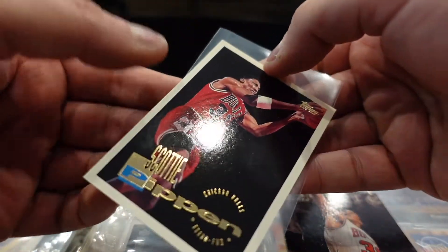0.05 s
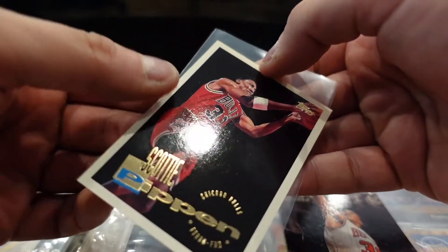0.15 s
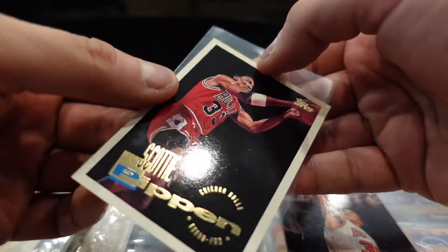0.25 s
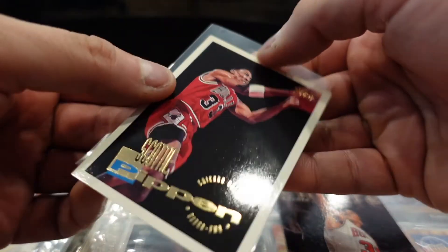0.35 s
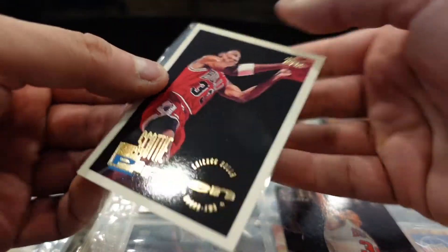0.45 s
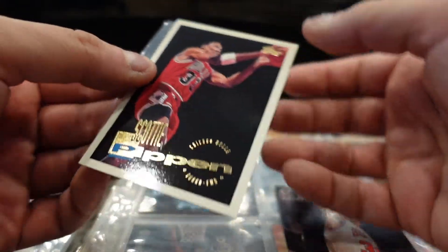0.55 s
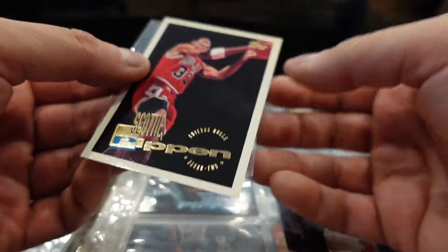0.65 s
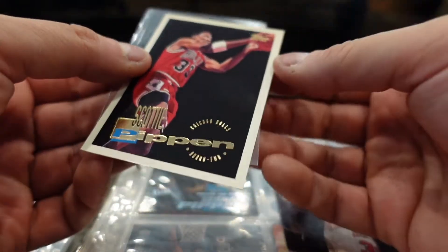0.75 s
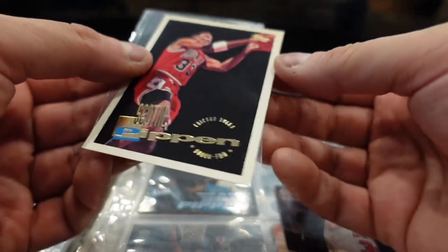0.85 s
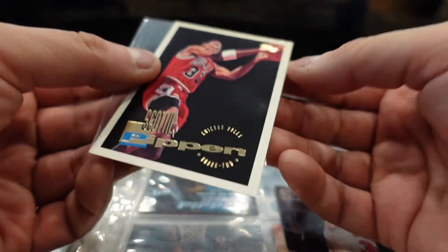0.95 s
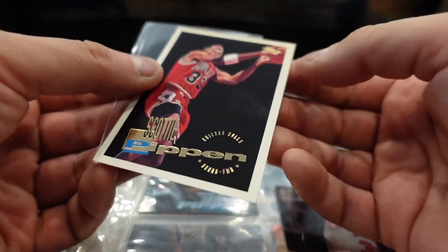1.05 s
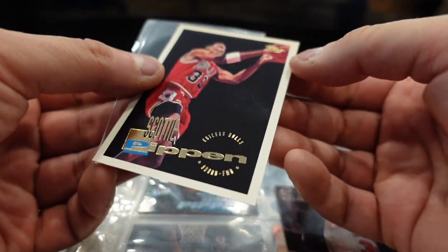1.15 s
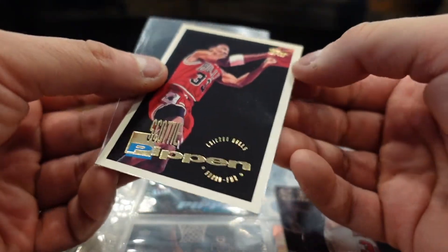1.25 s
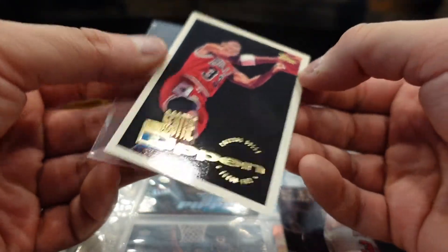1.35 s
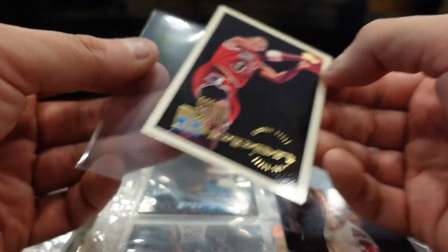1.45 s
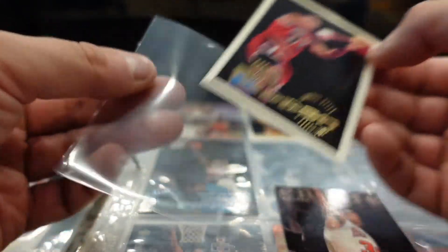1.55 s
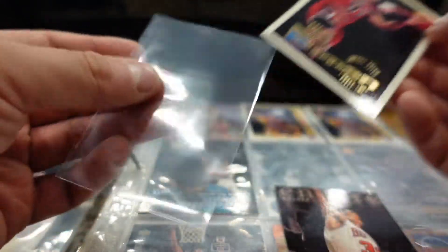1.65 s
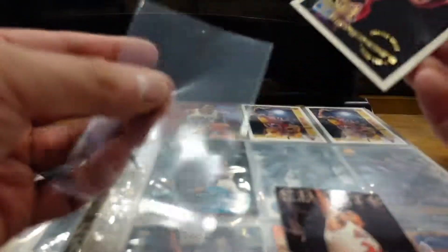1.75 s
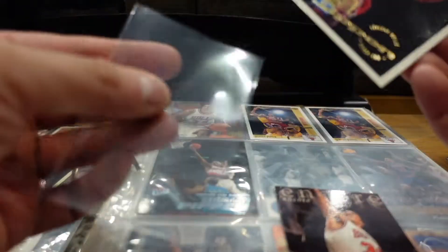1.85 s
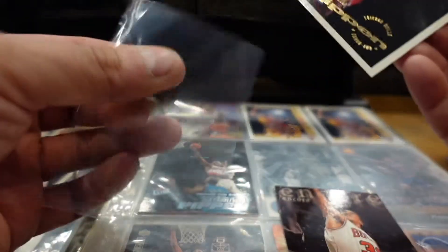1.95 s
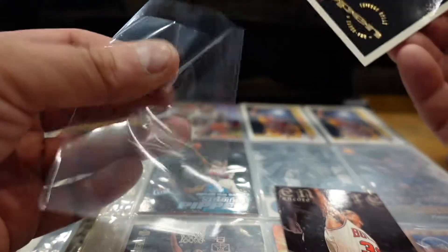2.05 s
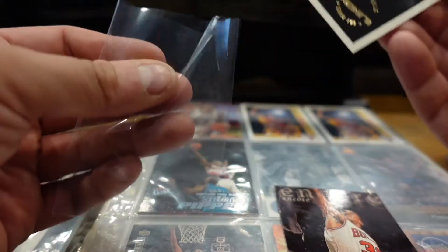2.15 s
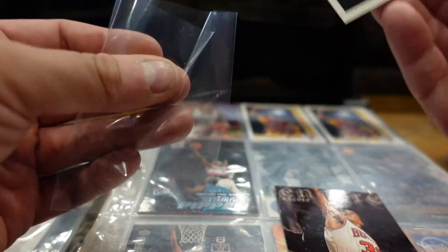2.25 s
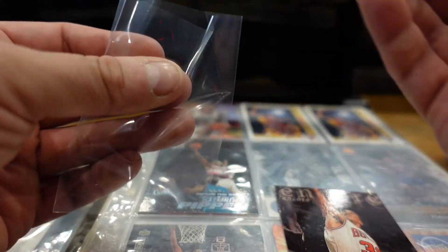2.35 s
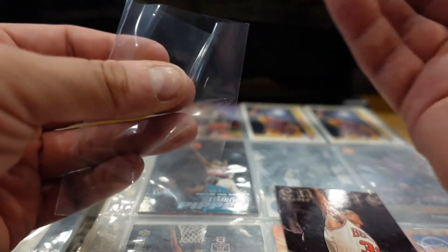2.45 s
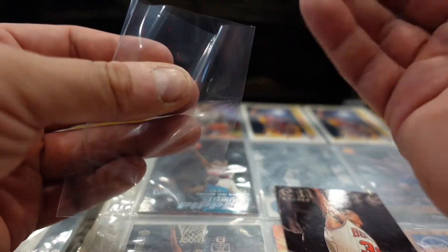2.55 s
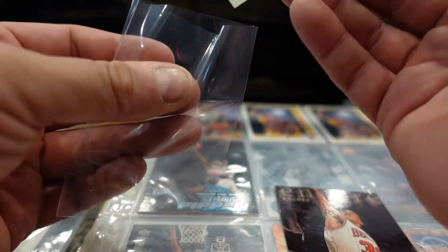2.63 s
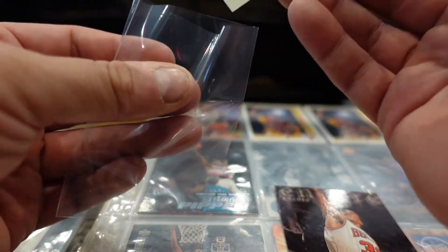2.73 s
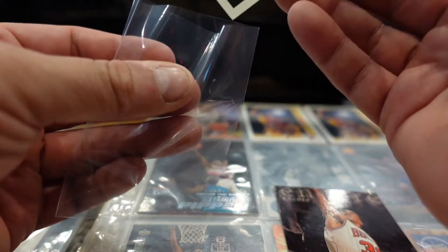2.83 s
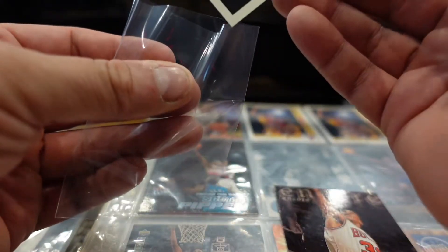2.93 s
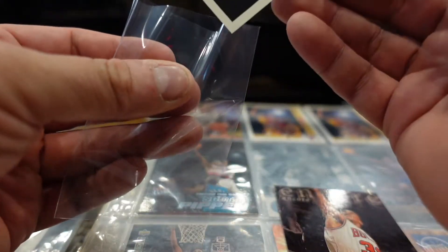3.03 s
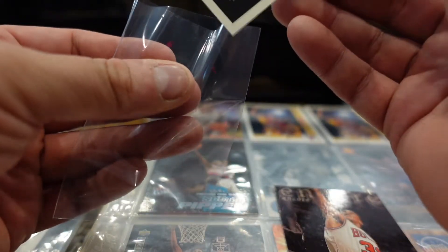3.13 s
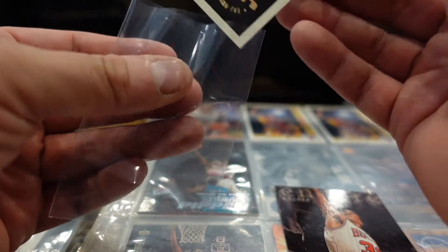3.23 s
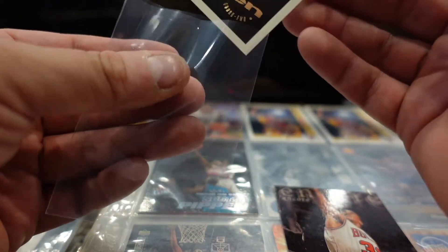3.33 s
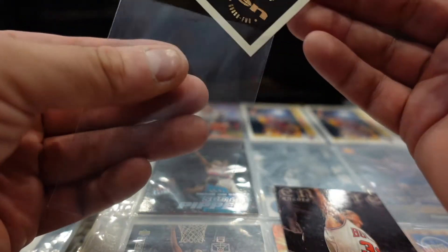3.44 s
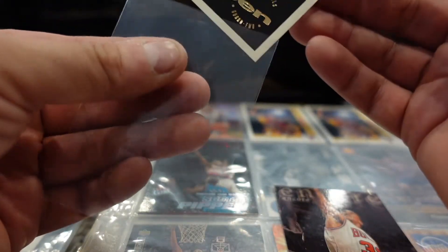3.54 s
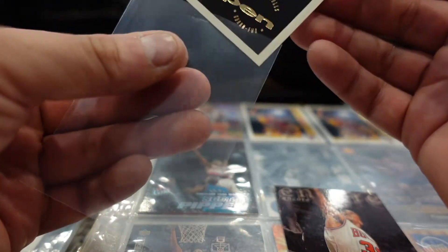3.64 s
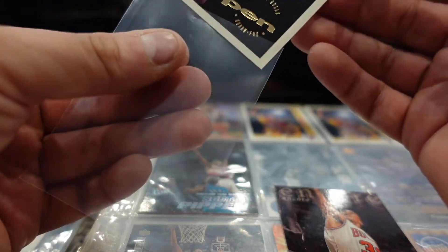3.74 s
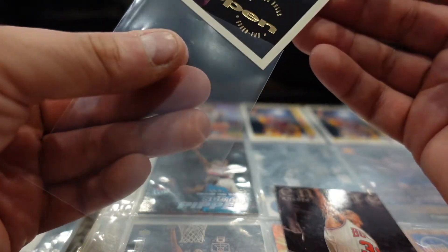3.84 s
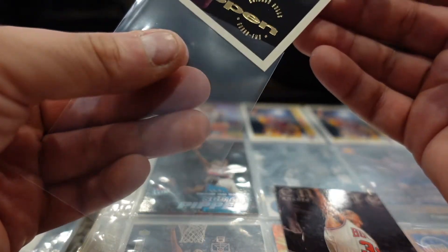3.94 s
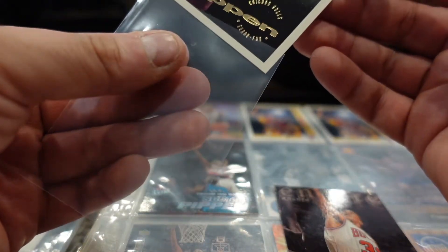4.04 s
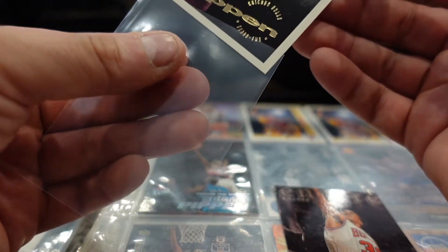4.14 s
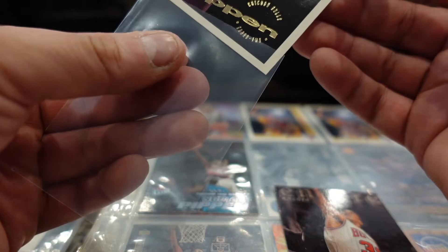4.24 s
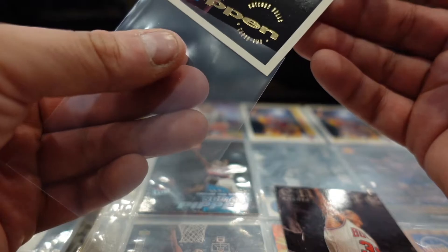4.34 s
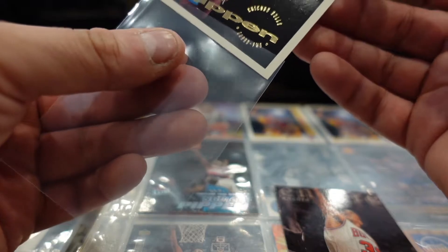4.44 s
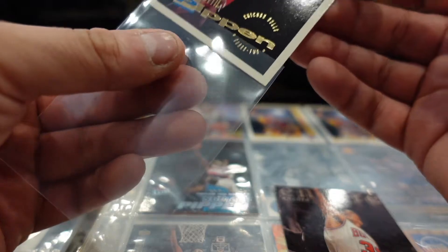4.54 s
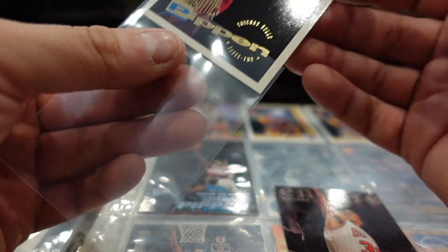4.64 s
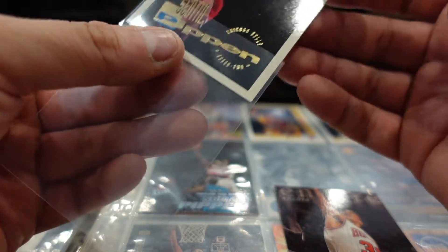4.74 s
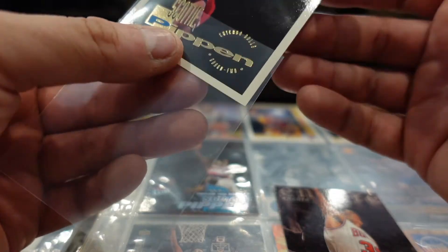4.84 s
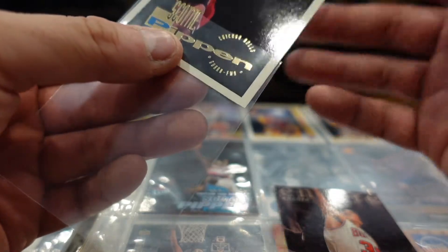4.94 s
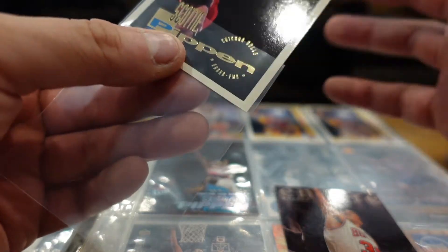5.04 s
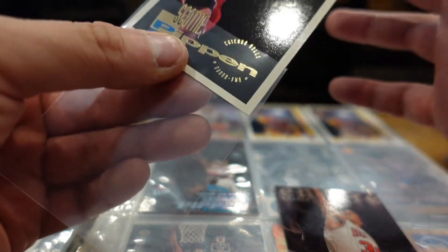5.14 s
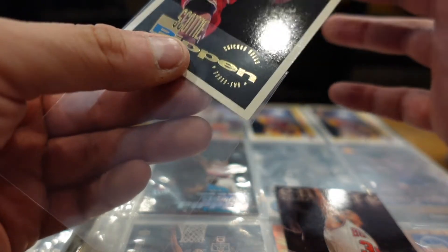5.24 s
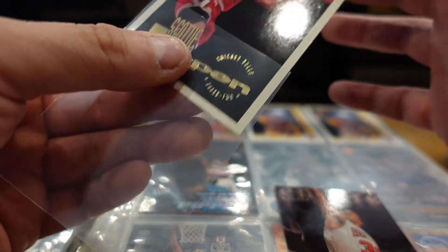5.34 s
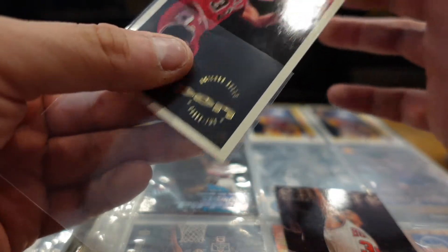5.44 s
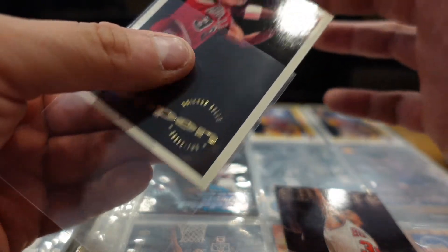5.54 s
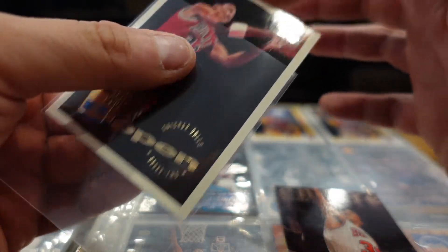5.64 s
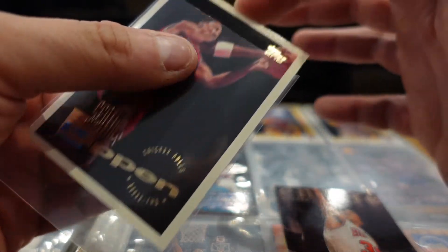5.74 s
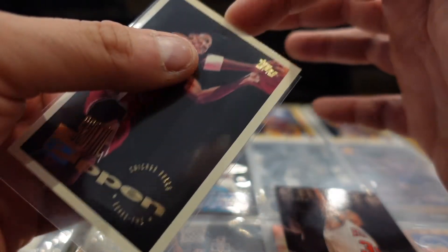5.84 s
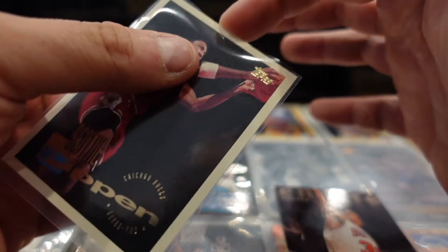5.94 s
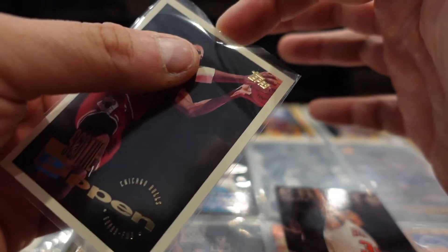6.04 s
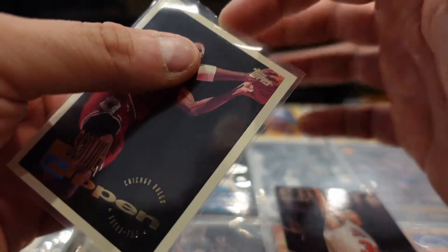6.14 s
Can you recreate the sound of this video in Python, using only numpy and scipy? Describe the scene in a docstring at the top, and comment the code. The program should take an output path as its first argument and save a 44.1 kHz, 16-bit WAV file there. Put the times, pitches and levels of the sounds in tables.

```python
"""A quiet room: close to a phone, two hands open a soft plastic sleeve and slide a card into it.
Creases snap and film scrapes as enveloped stick-slip ticks; rubbing is a longer bed of such ticks.
Ticks also ring the thin air spaces round the card; soft knocks are decaying sines with some noise.
Behind them: filtered noise as room rumble, middle and microphone hiss, and a thin tone drifting in level."""
import sys
import numpy as np
from scipy import signal
from scipy.fft import rfft, irfft, next_fast_len
from scipy.io import wavfile
from scipy.ndimage import uniform_filter1d, map_coordinates

SR = 44100
rng = np.random.default_rng(int(sys.argv[2]) if len(sys.argv) > 2 else 0)


def wav_out(sig):
    """Save sig, one row per channel (or a flat mono array), as 16-bit PCM at SR to the path in sys.argv[1]."""
    wavfile.write(sys.argv[1], SR, np.round(np.clip(np.atleast_2d(sig).T, -1, 1) * 32767).astype(np.int16))


N = 272626


def undb(db):
    """Amplitude ratio of a level in dB."""
    return 10 ** (np.asarray(db) / 20)


def unit(x):
    """Scale to RMS 1."""
    return x / np.sqrt(np.mean(x ** 2))


def fall60(t, t60_s):
    """Exponential decay, -60 dB at t60_s."""
    return np.exp(-np.log(1000) * t / t60_s)


def curve(table, column, outside):
    """One table column joined linearly over time; a fixed value beyond its ends."""
    points = np.array(table)
    return np.interp(np.arange(N) / SR, points[:, 0], points[:, column], outside, outside)


def swell(start_s, attack_s, hold_s, release_s, db, rest_db):
    """Level in dB: up from rest, held, back to rest; silent outside."""
    times_s = start_s + np.cumsum([0, attack_s, hold_s, release_s])
    return curve(np.c_[times_s, [rest_db, db, db, rest_db]], column=1, outside=-140)


def colour(x, points):
    """Filter by (frequency [Hz], gain [dB]) points joined on a log-frequency axis."""
    size = next_fast_len(x.shape[-1])
    points_hz, gains_db = np.array(points).T
    hz = np.maximum(np.arange(size // 2 + 1) * SR / size, 1)
    gain = undb(np.interp(np.log(hz), np.log(points_hz), gains_db))
    return irfft(rfft(x, size) * gain, size)[..., :x.shape[-1]]


def ring(x, hz, width_hz):
    """One resonance, gain 1 at the centre."""
    hz = min(hz, .4 * SR)
    return signal.lfilter(*signal.iirpeak(hz, hz / width_hz, SR), x)


def band(x, hz, width_hz):
    """The same resonance twice, at RMS 1."""
    return unit(ring(ring(x, hz, width_hz), hz, width_hz))


def walk(rate_hz):
    """Random levels, rate_hz a second, joined smoothly; spread near 1."""
    steps = np.repeat(rng.standard_normal(int(N / SR * rate_hz) + 2), 8)
    steps = 1.3 * uniform_filter1d(uniform_filter1d(steps, size=8), size=8)
    return np.interp(np.arange(N) * (8 * rate_hz / SR), np.arange(len(steps)), steps)


def slips(shape, spread_db):
    """Dense stick-slip ticks: most are tiny, a few stand out."""
    return unit(rng.standard_normal(shape) * undb(spread_db * rng.exponential(size=shape)))


def ports(x, pan_db, apart):
    """Two ports hear one sound; a share, scattered by hands and table, arrives differently at each."""
    tap = np.arange(96)
    scatter = rng.standard_normal(96) * np.exp(-tap / 60.0) * (tap > 8)
    side = apart * signal.lfilter(scatter / np.linalg.norm(scatter), [1], x)
    return np.array([(x + side) * undb(pan_db / 2), (x - side) * undb(-pan_db / 2)])


def add(out, start_s, x):
    """Mix a stereo event into out."""
    i = int(start_s * SR)
    out[:, i:i + x.shape[1]] += x[:, :N - i]


def crinkle(drive, hz, own_db, edge_db, body_db, flap_db):
    """Film answers round the crease's pitch: sharp edge above, sheet body and dull flap below; peak 1."""
    patch_db, patch_width = -10, .09  # width as a share of pitch
    patches_hz = 2500 * 3 ** rng.random(3)  # chance patches of film ring too
    patches = sum(unit(ring(drive, f, patch_width * f)) for f in patches_hz)
    top = band(drive, 4100.0, 6300.0)
    top = top + undb(own_db) * band(drive, hz, 0.42 * hz) + undb(patch_db) * patches
    top = signal.sosfilt(signal.butter(4, 8500., fs=SR, output="sos"), top)
    x = unit(top) + undb(edge_db) * band(drive, 9950.0, 5800.0)
    x = x + undb(body_db) * band(drive, 1603.0, 1100.0) + undb(flap_db) * band(drive, 880.0, 1203.0)
    return x / np.abs(x).max()


def snaps():
    """Creases buckle: ticks build in under a millisecond, then die away exponentially."""
    # (click time [s], peak [dB], centre [Hz], own pitch [dB], edge [dB], body [dB], flap [dB], t60 [s])
    snap_table = [(0.5774, -48.5, 5450, -18, -17, -20, -25, 0.019),
                  (0.708, -44, 5600, -6, -13, -25, -26, 0.097), (0.716, -46, 2940, 0, -12, -25, -25, 0.03),
                  (0.9186, -55, 6000, -10, -6, -20, -25, 0.0065),
                  (1.072, -48, 2700, 13, -36, -11, -24, .018), (1.5644, -42, 2800, 0, -13, 1, -8, 0.0095),
                  (1.642, -42.5, 7370, -5, -4, -16, -13, .028), (1.683, -43, 6500, -5, -14, -8, -8, .008),
                  (1.7585, -45, 2860, 18, -33, 12, -7, 0.016), (1.767, -40, 3070, 27, -42, 1, -10, 0.0061),
                  (1.8956, -23.5, 2700, 13, -55, 6.5, 2.5, 0.0097),
                  (1.9258, -45, 5000, -5, -15, -20, -20, .01),
                  (1.9452, -43, 4000, -5, -10, -15, -20, 0.011),
                  (1.9527, -37, 3500, -5, -15, -20, -22, .01),
                  (1.9826, -22.5, 3430, -12, -28, -4, -4, 0.011),
                  (1.9856, -20, 3160, 2, -27, -6, -8, 0.018),
                  (1.995, -26.5, 3570, -3, -12.5, -18, -15, 0.024),
                  (2.004, -32, 4000, -3, -15, -20, -18, .008), (2.078, -35, 3600, 0, -17, -20, -20, .012),
                  (2.089, -37, 3500, -3, -15, -15, -15, 0.01), (2.097, -29, 3970, -3, -10, -12, -8, 0.029),
                  (2.109, -14.5, 7700, 8.5, -12, -15, -18, 0.011),
                  (2.1116, -19.5, 8000, -3, -2, -3, -8, 0.011),
                  (2.1261, -11, 7440, -2, -10, -13, -29, 0.016),
                  (2.135, -12.5, 3960, -9, -24, -20, -18.5, 0.012),
                  (2.1479, -23, 3000, 3, -30, -6, -11, 0.0094),
                  (2.149, -8.5, 5700, -24, -41, -10.5, -18, 0.011),
                  (2.166, -20, 2500, 6, -18, -5, -13, 0.023), (2.3136, -46, 4440, 0, -27, -7, -2, 0.026),
                  (2.455, -38, 4580, -2, -35, -4, -19, 0.0082),
                  (2.9843, -45, 2890, 9, -31, -7.5, -15, 0.018),
                  (3.0251, -28, 3870, 7, -36, -2.5, -18, 0.018),
                  (3.0308, -33.5, 3030, -2, -33, -23, -11, 0.037),
                  (3.05, -36.5, 2930, -3, -30, -1, 2, 0.026), (3.152, -52, 6000, -5, -12, -20, -20, .008),
                  (3.1600, -24.5, 3900, -2, -30, -18, -25, 0.05),
                  (3.1637, -30, 4500, 1, -25, -10, -22, .025), (3.1682, -29, 4300, -1, -12, -2, -17, 0.027),
                  (3.181, -39, 4000, -7, -22, -6, -15, 0.013), (3.211, -34, 3500, -3, -20, -1, -12, 0.016),
                  (3.2255, -30, 4000, -6, -20, -3, -9, 0.012),
                  (3.2382, -30.5, 3600, 5, -20, -8, -20, 0.021),
                  (3.241, -23.5, 5100, -8, -22, -9, -18, 0.0032),
                  (3.257, -32, 4500, -6, -17, -7, -7, 0.0072), (3.268, -31, 3500, -1, -20, -1, -2, 0.014),
                  (3.277, -39, 5000, -9, -18, -5, -17, 0.01),
                  (3.3607, -38, 5330, -5, -30, -24, -15, 0.0093),
                  (3.4552, -36.5, 2950, 2, -14, -3.5, -4, 0.013),
                  (4.199, -56, 2840, -9, -12, -10, -10, 0.084), (4.636, -53, 6500, 8, -20, -25, -25, .04),
                  (4.644, -52.5, 2520, 9, -27.5, -15, -15, 0.021),
                  (4.787, -56, 4200, -3, -8, -15, -20, .03), (5.21, -50, 4000, -5, -20, 2, -5, .02),
                  (5.957, -43, 7000, -3, -9, -20.5, -21, .016),
                  (6.0127, -40, 8200, 4, -12, -20, -20, 0.017), (6.025, -41, 2800, 6, -30, -17, -20, 0.011),
                  (6.0325, -39, 2200, -6, -34, -3, -6, 0.014), (6.0447, -39, 5760, 8, -33, -22, -19, 0.012),
                  (6.075, -43, 2700, -6, -20, -4, -16, .01), (6.134, -35, 6900, 0, -28, -12, -30, 0.062),
                  (6.1441, -25.5, 6700, 13, -21, -32, -32, 0.031),
                  (6.1496, -13.5, 6600, -1, -32, -18, -23, 0.007)]
    rise_s, pan_db, pan_spread_db = .0006, -0.3, 0.5
    out, t = np.zeros((2, N)), np.arange(4400) / SR
    click = np.arange(len(t)) == int(rise_s * SR)
    all_ticks = slips((len(snap_table), len(t)), spread_db=1.88)
    for (click_s, db, *tone, t60_s), ticks in zip(snap_table, all_ticks):
        fall = fall60(t, t60_s) + 0.022 * np.exp(-t / 0.0078)
        # the buckle is one clean click amid rattle
        drive = ticks * fall * np.minimum(t / rise_s, 1) + 5 * click
        pan = pan_db + pan_spread_db * rng.standard_normal()
        add(out, click_s - rise_s, ports(undb(db) * crinkle(drive, *tone), pan, apart=0.078))
    return out


def scrapes():
    """Film on film: short runs of ticks that hold, then stop."""
    # (start [s], peak [dB], centre [Hz], own pitch [dB], edge [dB], body [dB], flap [dB],
    #  rise [s], length [s])
    scrape_table = [(0.372, -52, 2000, -3, -3, -3, -9, .003, 0.019),
                    (0.386, -44.5, 3600, -7, -11, -7, -6, 0.0091, 0.032),
                    (0.928, -54, 4470, -7, -8, 4, 1, 0.0025, 0.051),
                    (1.361, -53, 4500, -26, -10, -4, -24, 0.0027, 0.026),
                    (1.578, -46, 3430, -3, -11, -2, -14, 0.0047, 0.042),
                    (1.64, -43.5, 7300, 2, -17, -19, -22, .003, 0.015),
                    (1.655, -38.5, 2740, 11, -28, -12, 7.5, 0.0018, 0.0048),
                    (1.666, -46, 6040, -3, -12, -23, 2, 0.0045, 0.032),
                    (1.91, -33, 3800, -22, -9, -25, -13.5, 0.06, 0.105),
                    (2.0017, -32.5, 3800, 4, -15, -31, -28, 0.0071, 0.034),
                    (2.068, -30.5, 3700, 1.5, -12, -20, -20, 0.016, 0.04),
                    (2.964, -48, 2950, 5, -42, -3, -7, 0.0011, 0.025),
                    (3, -38, 3680, 2, -49, -6.5, -42.5, .002, 0.011),
                    (3.0249, -33.5, 3020, 12, -50, -5, -8.5, 0.0017, 0.02),
                    (3.1582, -27.5, 4100, -9, -22, -3, -1.5, 0.0022, 0.027),
                    (3.1882, -26.5, 2850, -8, -21, -4, 1.5, 0.0024, 0.029),
                    (3.2249, -30, 4300, -17, -29, -3.5, 0.5, .003, 0.029),
                    (3.2552, -32, 4840, -23, -14, -3.5, 1.5, 0.0025, 0.03)]
    out, t = np.zeros((2, N)), np.arange(4400) / SR
    all_ticks = slips((len(scrape_table), len(t)), spread_db=3.3)
    for (start_s, db, *tone, rise_s, length_s), ticks in zip(scrape_table, all_ticks):
        shape = np.minimum(t / max(rise_s, 1 / SR), 1) * np.exp(-(t / length_s) ** 3)
        add(out, start_s, ports(undb(db) * crinkle(ticks * shape, *tone), pan_db=0.46, apart=0.05))
    return out


def rubbing():
    """Card and fingers drag on film in ticks; its patches, as bands of wavering level, ring in turn."""
    # finger strokes: (start [s], attack [s], hold [s], release [s], level [dB], treble share [dB])
    strokes = [(1.31, 0.51, 0.0083, 0.042, -73, -4), (1.84, 0.08, 0.16, 0.021, -60.5, -7.5),
               (2.092, 0.0084, 0.011, 0.53, -52.5, -8), (3.075, 0.23, 0.011, 0.35, -64, -2.5)]
    # the card slides in: (time [s], level [dB], treble share [dB])
    slide = [(4.42, -91.5, -2.5), (4.53, -79.5, -1), (4.62, -74, -2.5), (4.68, -65.5, -5),
             (4.73, -67, -4.5), (4.79, -67.5, -0.5), (4.84, -79, -1), (4.94, -59, -30), (5.12, -71, -22),
             (5.28, -64, -9), (5.37, -59.5, -5), (5.47, -59, -2.5), (5.6, -54.5, -6.5), (5.7, -57.5, -3),
             (5.78, -57, -8.5), (5.82, -58.5, -3.5), (5.9, -58, -11.5), (6.0, -68, -8), (6.05, -64, -18),
             (6.18, -64, -8)]
    # rubbed film: (frequency [Hz], spectral density [dB per Hz])
    film = [(880, -42.5), (1500, -7), (1910, -14.5), (2160, -5), (3150, -5), (3750, -1), (4720, -3),
            (5610, -2.5), (9180, -9.5), (15000, -21)]
    touch_db = -81.5  # level at which a stroke starts and ends
    usual_treble_db = -6.5  # treble share at usual contact
    ticks = unit(colour(slips(N, spread_db=2.3), film)) * undb(walk(32) + 0.87 * walk(7.5))
    # the strongest contact of the moment sets level and brightness
    stroke_levels = [swell(*s[:-1], touch_db) for s in strokes]
    levels_db = np.array(stroke_levels + [curve(slide, column=1, outside=-140)])
    trebles_db = [np.full(N, s[-1]) for s in strokes] + [curve(slide, column=2, outside=0)]
    treble_db = np.choose(levels_db.argmax(axis=0), trebles_db) * 1.
    treble_db = uniform_filter1d(treble_db, size=900)
    x, below = 0, 0
    for hz in 2200 * 2 ** np.arange(0, 3.1, 1 / 3):
        under = colour(ticks, [(.9 * hz, 0), (1.25 * hz, -30)])
        reach = np.clip(np.log2(hz / 3600.0), 0, 1.2)  # how far treble acts on this band
        patch_db = 1.6 * walk(16)
        x = x + (under - below) * undb(patch_db + (treble_db - usual_treble_db) * reach)
        below = under
    return ports(undb(levels_db.max(axis=0)) * x, pan_db=0.5, apart=0.24)


def hollow(level_db, modes, pan_db, apart, low_db=0, glide=0):
    """Ticks ring a thin air space; as its shape changes, the modes waver apart in pitch and level."""
    skirt_db, waver_share = -1.5, .009
    ticks, x, on = slips(N, spread_db=2), np.zeros(N), level_db > -120
    for hz, width_hz, db in modes:
        core = band(ticks[on], hz, 2.4 * width_hz)
        skirt = unit(ring(ticks[on], hz, 200 + 6 * width_hz))
        mode = core + undb(skirt_db) * skirt
        # varying read speed bends the mode's pitch
        speed = 1 + glide + waver_share * walk(14)
        mode = map_coordinates(mode, [np.cumsum(speed[on])], mode="mirror")
        mode_db = db + walk(30) + walk(7) + low_db * (1000 < hz < 2200)
        x[on] += undb(mode_db)[on] * mode
    x[on] = unit(x[on])
    return ports(x * undb(level_db), pan_db, apart)


def push():
    """The last shove: the card's edges ring the shrinking air pocket, from a sudden start."""
    # air pocket before glide: (frequency [Hz], width [Hz], level [dB])
    pocket = [(258, 45, -5.5), (1838, 32, -4.5), (1946, 45, -6.5), (2800, 150, -8), (3600, 65, 3),
              (3970, 39, -2), (4740, 33, -0.5), (5130, 60, 2.5), (5700, 85, -6.5), (6600, 130, 0),
              (7700, 250, -7)]
    start_s, attack_s, start_db, sag_db_per_s = 5.8, 0.016, -51, 15  # the push tires
    low_start_db, low_end_db, fills_s = -5, 3.5, 0.2  # modes near 2 kHz come up
    # the pocket starts tight: modes fall by this share, then creep up
    fall_share, fall_s, rise_share_per_s = 0.041, 0.0247, 0.0607
    since = np.maximum(np.arange(N) / SR - start_s, 1e-9)
    attack_db = 20 * np.log10(np.minimum(since / attack_s, 1))
    level_db = start_db - sag_db_per_s * since + attack_db
    low_db = low_start_db + (low_end_db - low_start_db) * np.minimum(since / fills_s, 1)
    glide = fall_share * np.exp(-since / fall_s) + rise_share_per_s * (since - fills_s)
    return hollow(level_db, pocket, 2.9, 0.65, low_db, glide)


def entry():
    """The corner slips in: the open sleeve rings, its modes sinking as the card enters."""
    # open sleeve, pitch as at 5 s: (frequency [Hz], width [Hz], level [dB])
    mouth = [(2700, 160, -3), (3910, 96, 0), (4310, 75, -1), (4560, 80, -2), (5170, 120, 0),
             (5630, 110, -1), (6200, 110, -2.5), (6900, 200, -11)]
    sink_share_per_s = .05
    level_db = swell(start_s=4.68, attack_s=.27, hold_s=.02, release_s=.33, db=-63, rest_db=-73.5)
    glide = sink_share_per_s * (5 - np.arange(N) / SR)
    return hollow(level_db, mouth, pan_db=3.7, apart=0.74, glide=glide)


def half_way():
    """With the card half way in, the gap between card and film rings."""
    # gap: (frequency [Hz], width [Hz], level [dB])
    gap = [(3620, 190, 4), (3850, 53, 4), (4280, 190, -1.5), (5690, 240, -6), (6290, 230, -13),
           (6840, 82, -15), (6660, 44, -4), (7000, 57, -15), (7610, 210, -11)]
    level_db = swell(start_s=5.36, attack_s=0.28, hold_s=0.028, release_s=0.22, db=-63, rest_db=-64)
    return hollow(level_db, gap, pan_db=1.5, apart=0.66)


def lying_card():
    """The air under the card lying on the film rings."""
    # air under the card: (frequency [Hz], width [Hz], level [dB])
    lying = [(1746, 37, -1.5), (2840, 60, -6.5), (3970, 50, -11)]
    level_db = swell(start_s=0.0067, attack_s=0.043, hold_s=0.56, release_s=.1, db=-70, rest_db=-78)
    return hollow(level_db, lying, pan_db=0.37, apart=0.67)


def knocks():
    """A soft fingertip push rings the bending card, a little roughly: sine plus narrow noise."""
    # (middle of rise [s], peak [dB], pitch [Hz])
    knock_table = [(0.05, -51.5, 524), (0.374, -44, 500), (0.499, -49.5, 465), (1.688, -45.5, 714),
                   (1.701, -44.5, 505), (1.713, -54, 560), (1.753, -41, 605), (1.771, -46, 541),
                   (1.78, -49, 555), (1.79, -55, 563), (1.801, -43, 595), (1.816, -54.5, 594),
                   (1.854, -50.5, 560), (1.938, -52.5, 560), (1.951, -52, 610), (1.988, -39, 472),
                   (1.989, -43, 194), (1.999, -38.5, 595), (2.012, -47.5, 507), (2.128, -42, 305),
                   (2.137, -41.5, 396), (2.147, -40.5, 213), (2.168, -43, 305), (3.05, -47.5, 254),
                   (3.162, -43, 269), (3.167, -52, 143), (3.249, -41, 282), (3.574, -46.5, 542),
                   (3.958, -52, 570), (3.97, -56, 984), (4.07, -53.5, 557)]
    rise_s, t60_s = 0.0037, 0.046
    out, t = np.zeros((2, N)), np.arange(4000) / SR
    shape = np.minimum(t / rise_s, 1) ** 2 * fall60(t, t60_s)
    for middle_s, db, hz in knock_table:
        rough = band(rng.standard_normal(len(t)), hz, 0.7 * hz)
        x = shape * (np.sin(2 * np.pi * hz * t) + 0.45 * rough)
        add(out, middle_s - rise_s / 2, undb(db) * np.array([x, x]) / np.abs(x).max())
    return out


def lean_left(near):
    """The hands' treble leans left."""
    # (frequency [Hz], left minus right [dB])
    treble_left = [(5000, 0), (9000, 1.3)]
    left = colour(near[0], [(hz, db / 2) for hz, db in treble_left])
    right = colour(near[1], [(hz, -db / 2) for hz, db in treble_left])
    return np.array([left, right])


def reflections(near):
    """Table and walls return a short tail, a little bright in the treble: decaying noise as impulse response."""
    t = np.arange(SR // 3) / SR
    tail = colour(rng.standard_normal((2, len(t))), [(300, -4.0), (4000, -4.5), (12000, -1.5)])
    tail = tail * fall60(t, 0.25) * (t > .004)
    tail = tail / np.sqrt(np.sum(tail ** 2, axis=1, keepdims=True))
    return undb(-12.5) * signal.fftconvolve(near, tail, axes=1)[:, :N]


def thin_tone():
    """A sine wavering slightly in pitch and drifting in level, 1.5 rad apart between channels."""
    # (time [s], level [dB])
    tone_levels = [(0, -78), (.15, -88), (.5, -79.5), (.9, -73), (1.35, -72), (1.85, -75.5), (2.4, -78.5),
                   (2.6, -99.5), (3.3, -85), (3.65, -74.5), (4.55, -78), (6.18, -83)]
    centre_hz = 2826
    phase = 2 * np.pi * np.cumsum(centre_hz + 1.74 * walk(14)) / SR
    level_db = curve(tone_levels, column=1, outside=-84) + 1.8 * walk(6.1)
    return np.sqrt(2) * undb(level_db) * np.sin(phase + np.array([[0], [1.5]]))


def room():
    """Noise split into bands: rumble and middle swell and waver; lowest bass and hiss stay steady."""
    # left-right likeness: (frequency [Hz], correlation [0-1])
    likeness = [(60, 0.97), (250, 0.55), (1000, 0), (8000, 0.3)]
    # noise spectrum: (frequency [Hz], spectral density [dB per Hz])
    spectrum = [(18, -60.5), (30, -27), (97, -11.5), (123, -4), (156, -7), (182, -4.5), (263, -2),
                (410, -6), (575, -8.5), (691, -10), (970, -9.5), (2690, -18), (2910, -13.5), (3150, -20.5),
                (15500, -32)]
    # favoured modes: (frequency [Hz], width [Hz], added level [dB])
    room_modes = [(68.5, 10, 11), (140, 25, -6), (591, 57, -3), (1142, 40, 0.5)]
    # swell: (time [s], level change [dB])
    room_swell = [(0.0, 1.5), (0.34, 4), (0.64, -1.5), (0.95, 2.5), (1.26, -1), (1.55, 0.5), (2.05, 4),
                  (2.41, 1), (2.63, -6), (2.99, -0.5), (3.2, 6), (3.35, 5.5), (3.67, -2), (4.75, -2),
                  (5.85, -3), (6.06, -1), (6.18, -2)]
    rumble_db, middle_db, steady_db = -65.5, -63.5, -63.0
    middle_follows, rumble_waver_db = 0.58, 1.8  # share of the swell; spread
    mid, side = rng.standard_normal((2, N))
    hz, alike = np.transpose(likeness)
    alike = np.clip(alike, 0, .99)
    mid = colour(mid, np.c_[hz, 10 * np.log10(1 + alike)])
    side = colour(side, np.c_[hz, 10 * np.log10(1 - alike)])
    air = colour(np.array([mid + side, mid - side]), spectrum)
    air = unit(air + sum(undb(db) * ring(air, f, width_hz) for f, width_hz, db in room_modes))
    under_90, under_330, under_1900 = [
        colour(air, [(f, 0), (2 * f, -24), (4 * f, -60)]) for f in (90, 330, 1900)]
    swell_db = curve(room_swell, column=1, outside=0)
    rumble_level_db = rumble_db + swell_db + rumble_waver_db * walk(3.45)
    middle_level_db = middle_db + middle_follows * swell_db + walk(5.7)
    rumble = unit(under_330 - under_90) * undb(rumble_level_db)
    middle = unit(under_1900 - under_330) * undb(middle_level_db)
    steady = (under_90 + air - under_1900) * undb(steady_db)
    return rumble + middle + steady


def scene():
    """Hands, sleeve and card with their reflections, over the room and the tone."""
    film = snaps() + scrapes() + rubbing()
    air_spaces = push() + entry() + half_way() + lying_card()
    near = lean_left(film + air_spaces + knocks())
    return near + reflections(near) + room() + thin_tone()


def record(dry):
    """Thins the lowest bass and ends the treble steeply near 16 kHz."""
    low_cut_hz, top_hz = 65.6, 15900
    thin = signal.sosfilt(signal.butter(2, low_cut_hz, "high", fs=SR, output="sos"), dry)
    return signal.sosfilt(signal.ellip(10, .2, 70, top_hz, fs=SR, output="sos"), thin)


dry = scene()
out = record(dry)
wav_out(out)
```